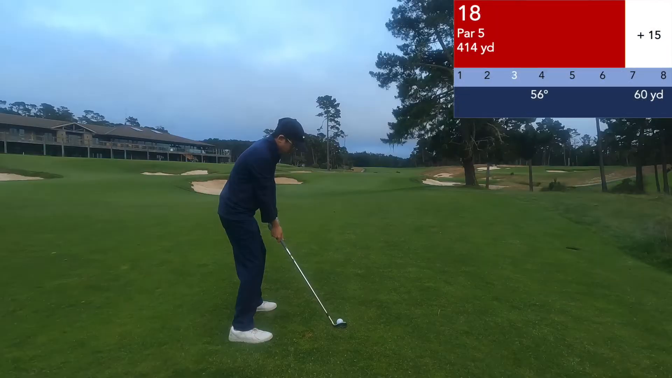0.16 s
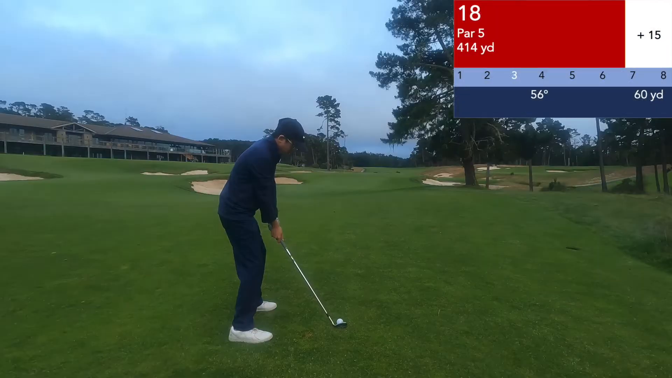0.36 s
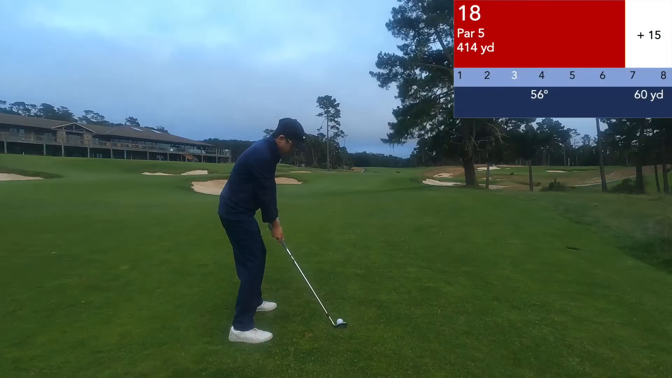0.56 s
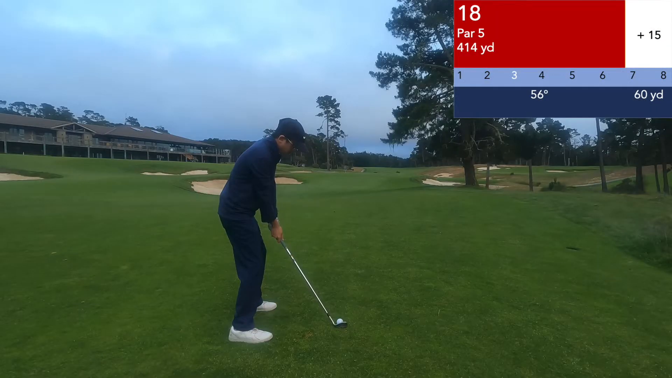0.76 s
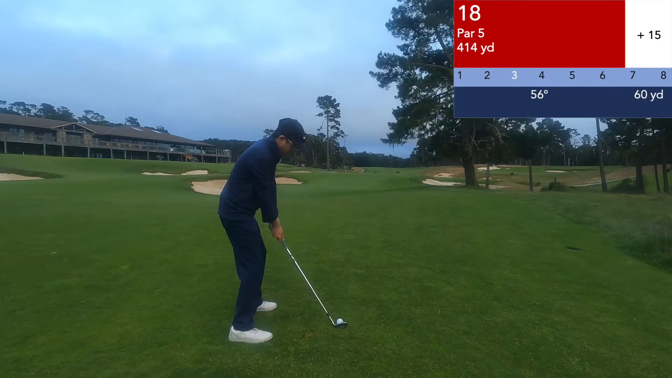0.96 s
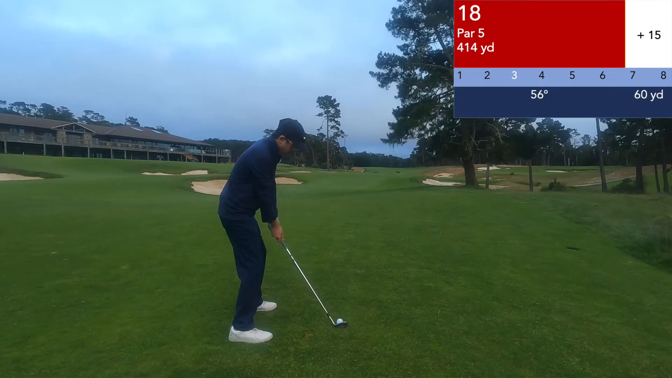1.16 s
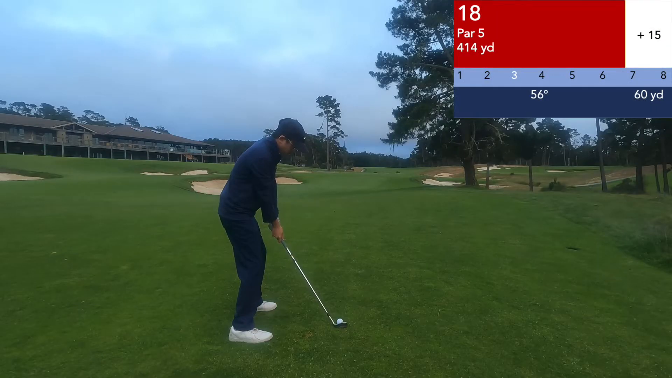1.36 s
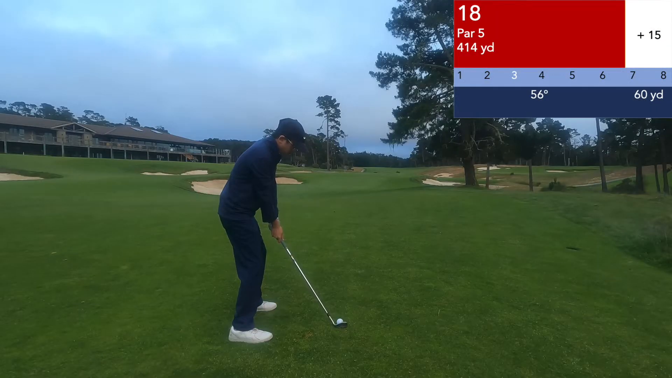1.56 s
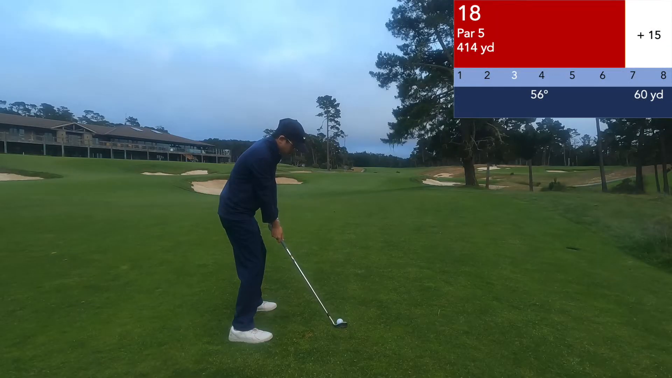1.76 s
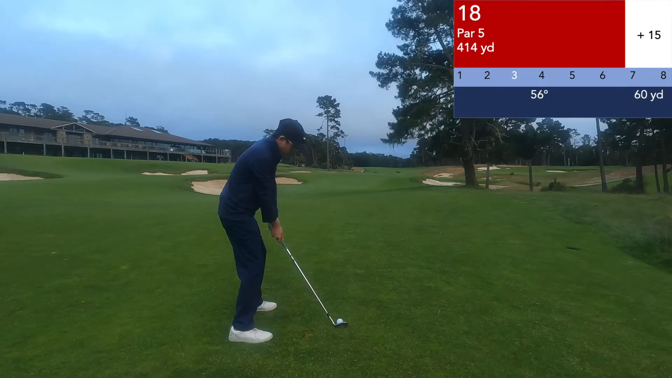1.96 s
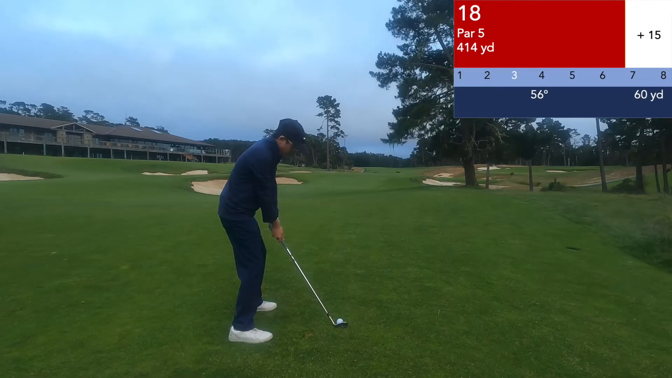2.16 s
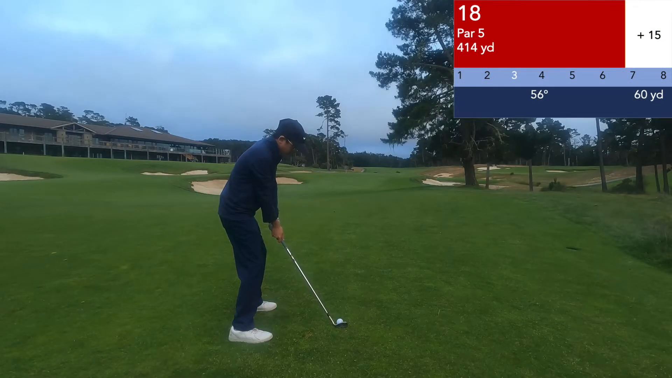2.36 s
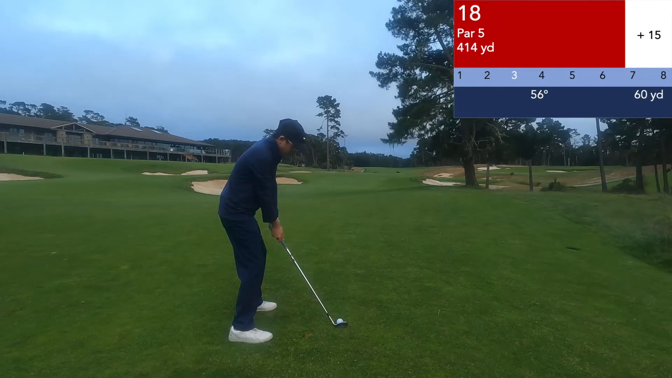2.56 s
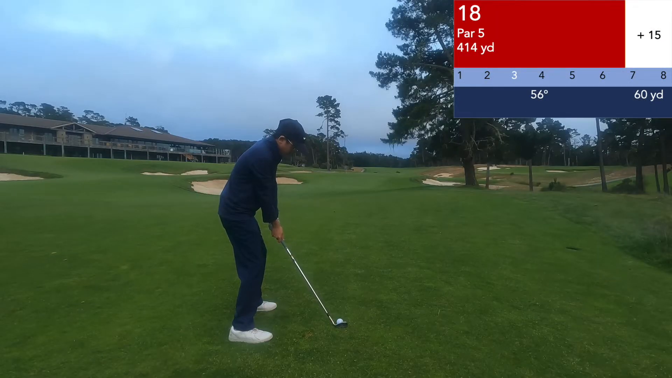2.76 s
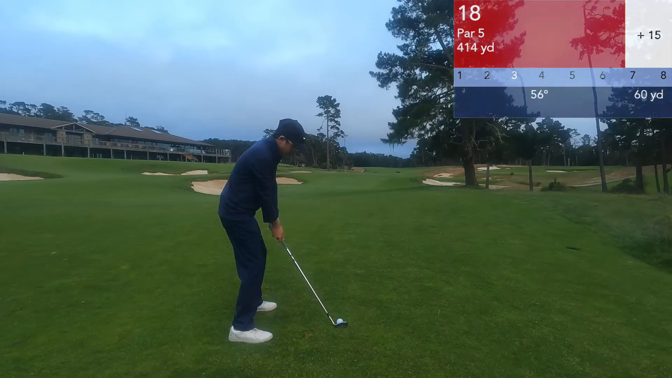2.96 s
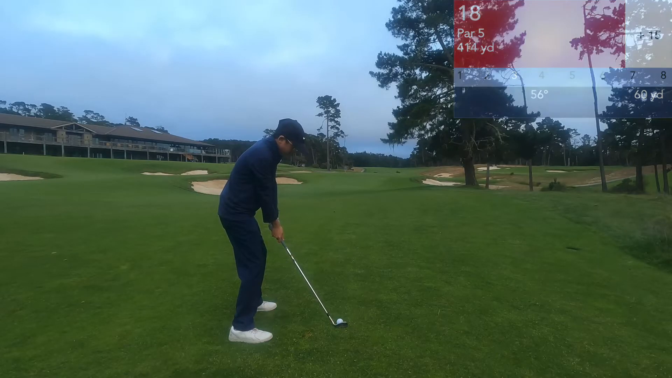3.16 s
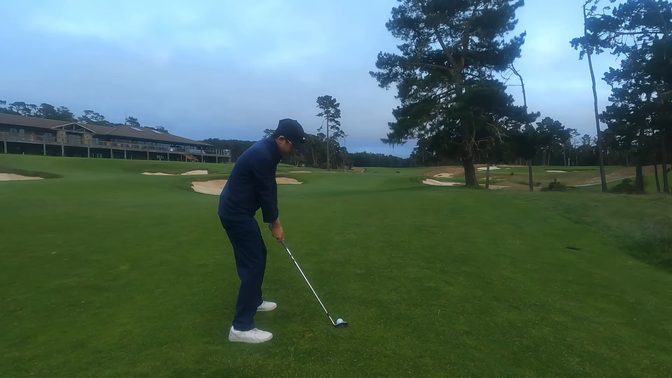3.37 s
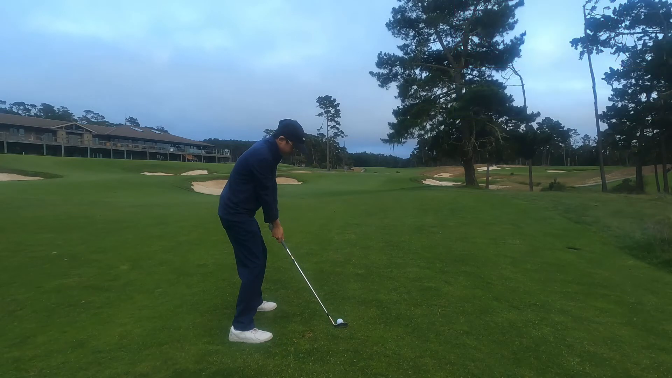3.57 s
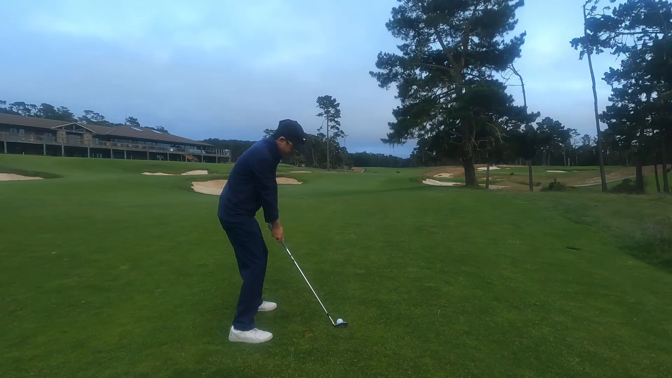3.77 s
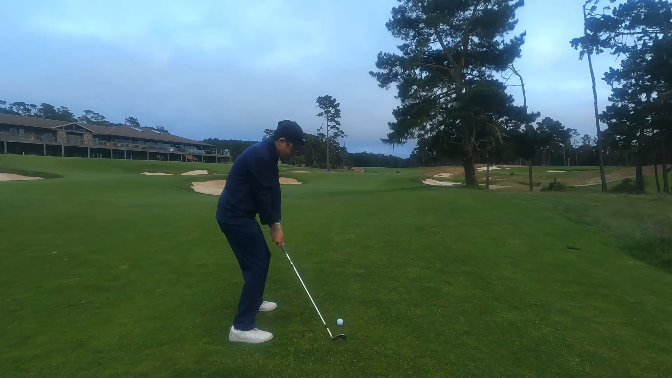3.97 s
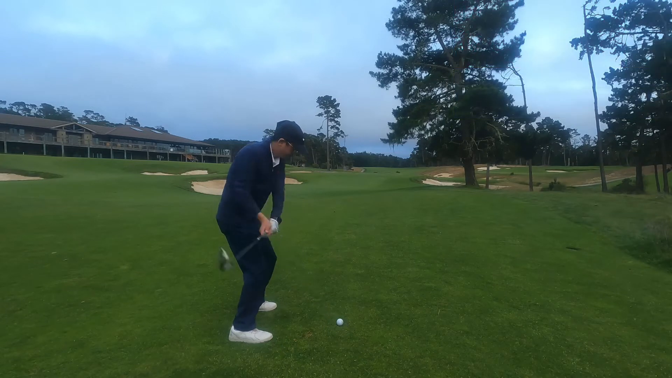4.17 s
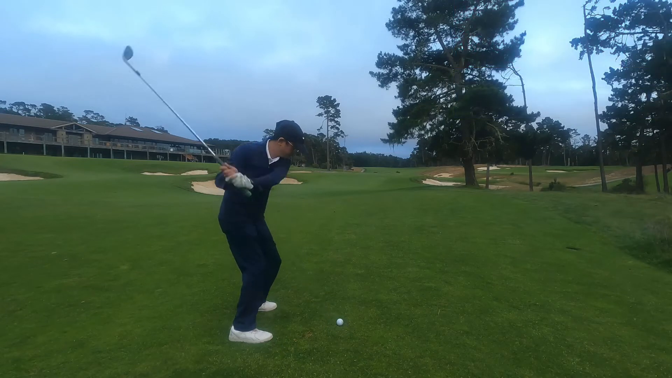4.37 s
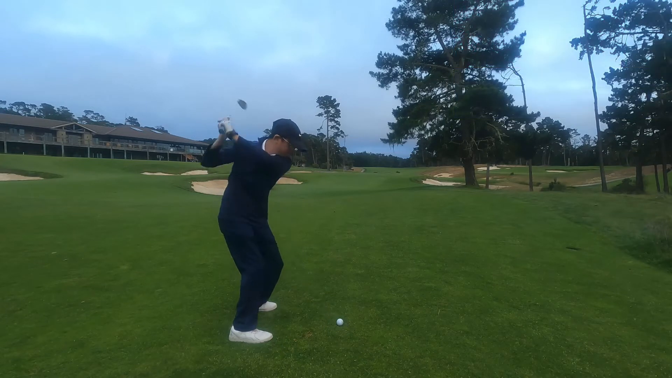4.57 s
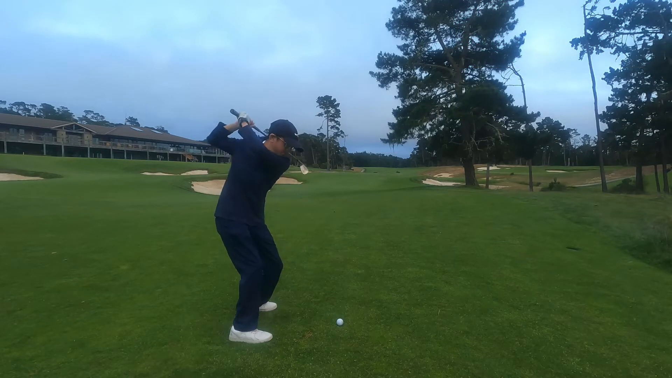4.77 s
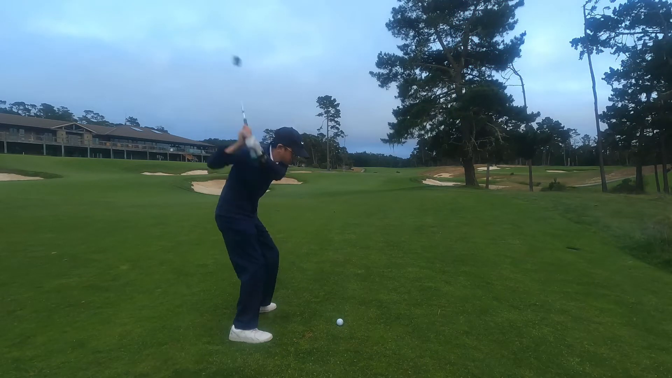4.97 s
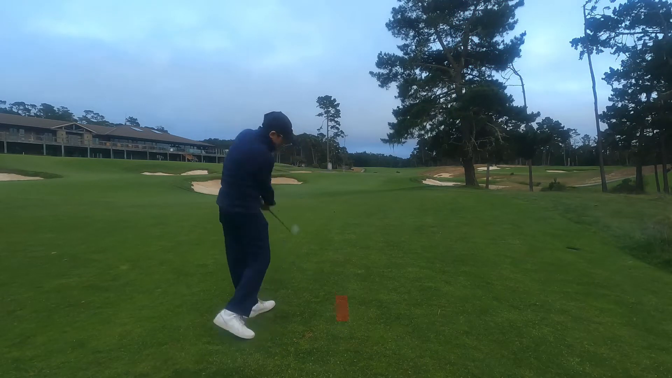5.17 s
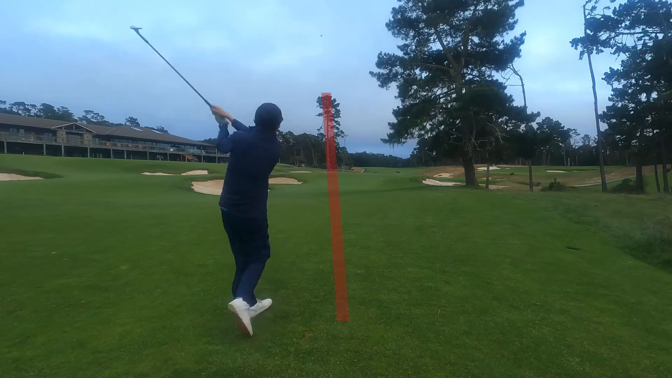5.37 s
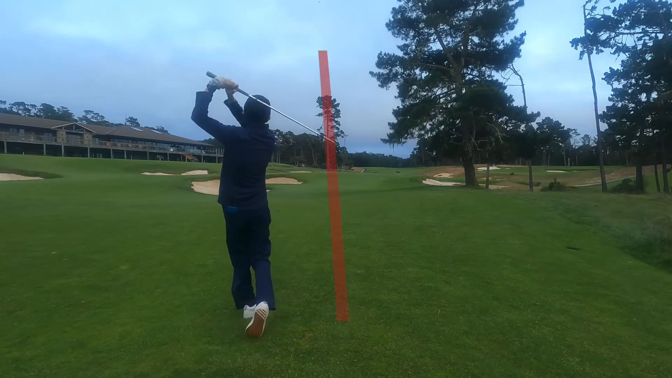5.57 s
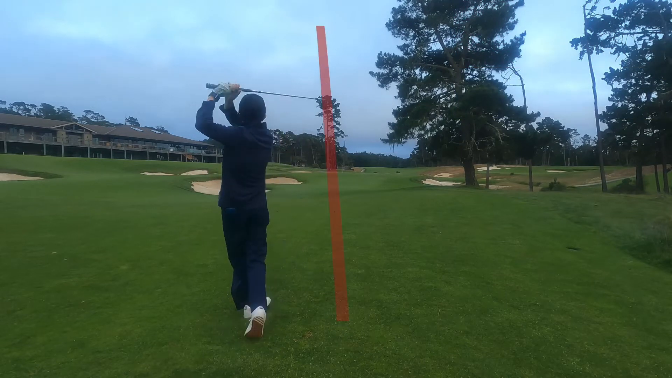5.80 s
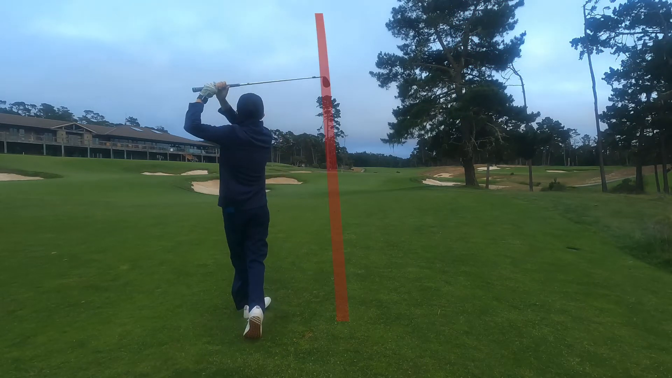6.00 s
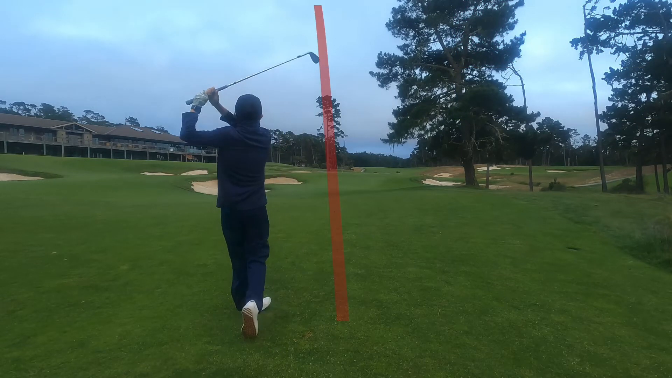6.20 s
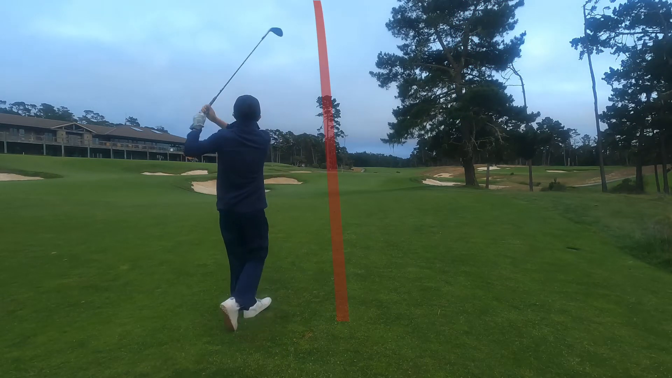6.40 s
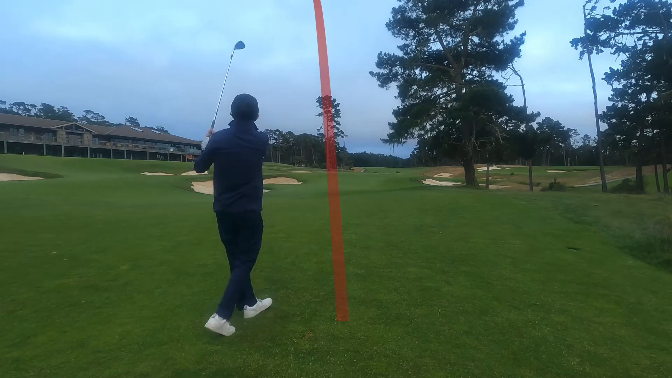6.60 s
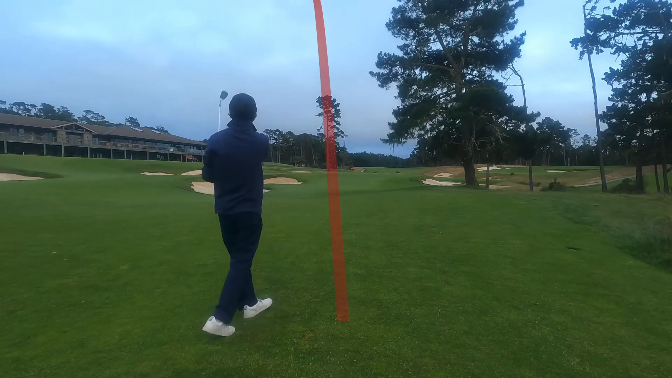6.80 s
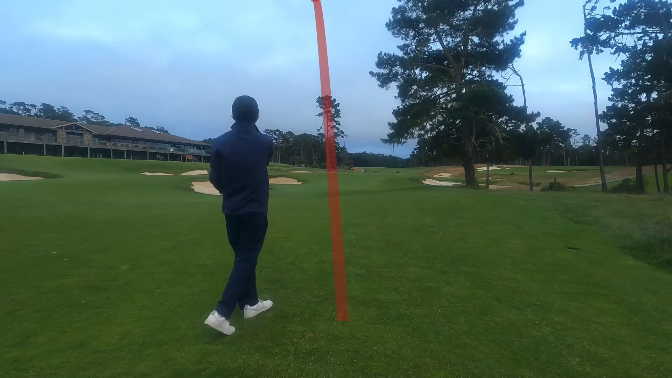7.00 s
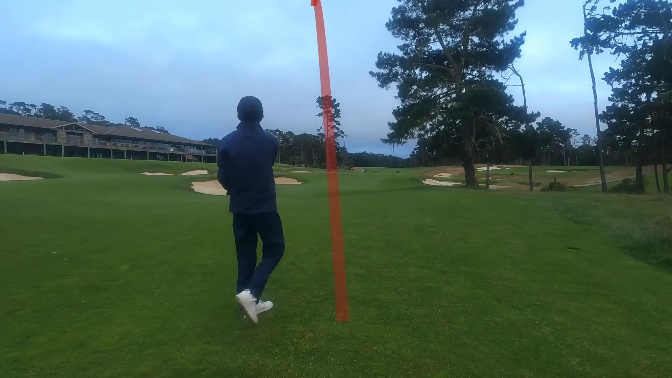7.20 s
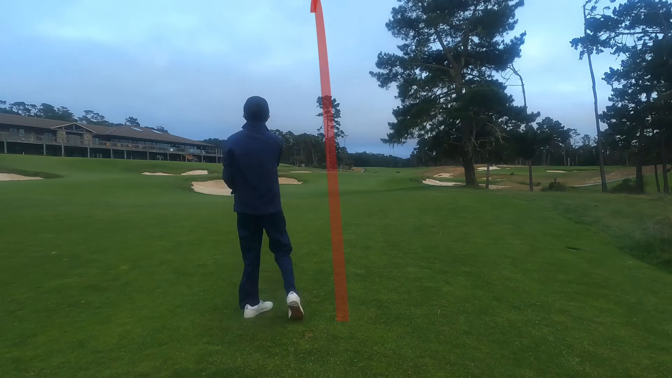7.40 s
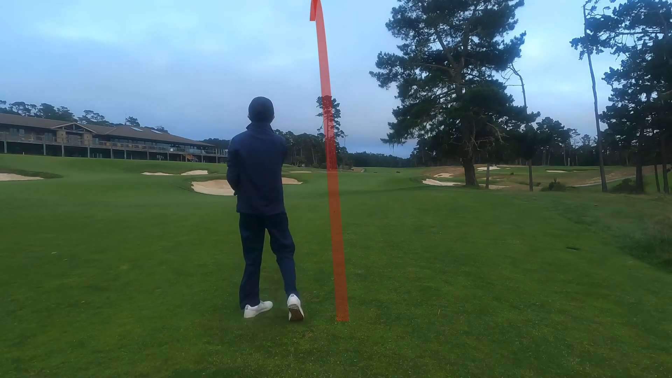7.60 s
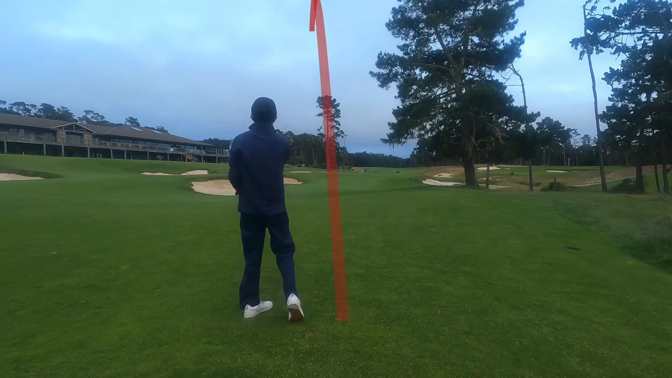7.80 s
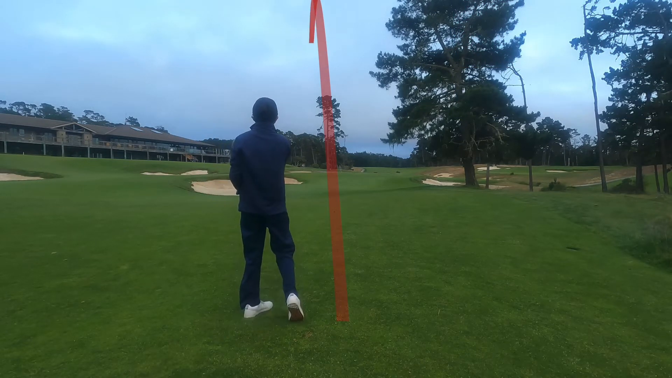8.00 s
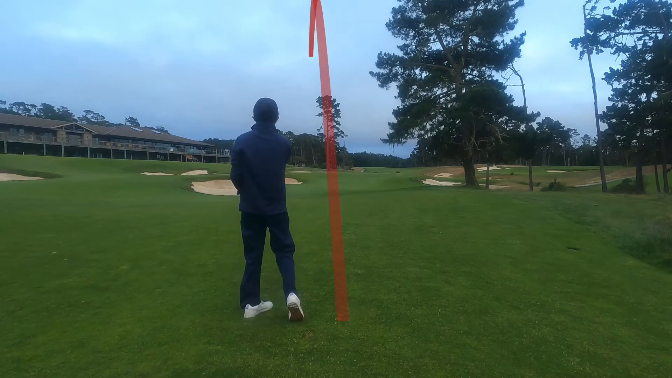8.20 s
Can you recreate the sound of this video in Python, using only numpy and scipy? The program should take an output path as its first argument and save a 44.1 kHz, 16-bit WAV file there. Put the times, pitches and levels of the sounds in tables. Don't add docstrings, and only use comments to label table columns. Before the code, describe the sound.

A golf wedge whips through the air and cracks a ball off soft turf while songbirds warble over a low distant rumble.

```python
import sys
import numpy as np
from scipy import signal
from scipy.fft import rfft, irfft, next_fast_len
from scipy.io import wavfile

SR = 44100
rng = np.random.default_rng(int(sys.argv[2]) if len(sys.argv) > 2 else 0)


def generate_wav(signal):
    frames = np.transpose(np.atleast_2d(signal))
    scaled = np.clip(frames, -1, 1) * 32767
    pcm = np.round(scaled).astype(np.int16)
    wavfile.write(sys.argv[1], SR, pcm)


def volts_from_decibels(level):
    exponent = np.asarray(level, float) / 20
    return 10 ** exponent


N = 363774


def rms_one(x):
    return x / np.sqrt(np.mean(x ** 2) + 1e-20)


def at_hz(points, hz):
    table_hz, value = np.transpose(points)
    return np.interp(np.log(hz), np.log(table_hz), value)


def level_curve(s, db):
    return volts_from_decibels(np.interp(np.arange(N) / SR, s, db, left=-150, right=-150))


def sides(db):
    return volts_from_decibels(np.multiply.outer([.5, -.5], db))


def drift(rate_hz, size=N):
    r = np.exp(-2 * np.pi * rate_hz / SR)
    noise = rng.standard_normal(size + SR)
    return rms_one(signal.lfilter([1], [1, -2 * r, r * r], noise)[SR:])


def ring(clicks, hz, t60):
    r = volts_from_decibels(-60 / (t60 * SR))
    w = 2 * np.pi * hz / SR
    return signal.lfilter([0, np.sin(w)], [1, -2 * r * np.cos(w), r * r], clicks + 1e-18)


def click(s, soft_hz, order=2):
    out = np.zeros(N)
    out[round(s * SR)] = 1
    return signal.sosfilt(signal.butter(order, soft_hz, fs=SR, output="sos"), out)


def trees(x, t60, wet_db):
    u = np.arange(SR // 2) / SR
    shared = rng.standard_normal(len(u))
    own = rng.standard_normal((2, len(u)))
    fade_in = np.clip(u / 0.0071, 0, 1)
    tail = (shared + .6 * own) * volts_from_decibels(-60 * u / t60) * fade_in
    tail = tail / np.sqrt(np.sum(tail ** 2, axis=1, keepdims=True))
    return x + volts_from_decibels(wet_db) * signal.fftconvolve(x, tail, axes=1)[:, :N]


def port(x):
    return signal.sosfilt(signal.butter(5, 7600.0, fs=SR, output="sos"), x)


def ring_modes(hit, modes):
    return sum(volts_from_decibels(db) * sides(lean_db)[:, None] * ring(hit, hz, t60) for hz, db, t60, lean_db in modes)


def torn_grass():
    # start_s, level_db
    divot = [(5.1587, -51), (5.16, -26), (5.167, -33), (5.171, -47), (5.19, -67.5), (5.28, -58),
             (5.361, -63)]
    grains = rng.standard_normal(N) * volts_from_decibels(4.3 * drift(400.0))
    band = signal.butter(1, [300.0, 1500.0], "band", fs=SR, output="sos")
    torn = rms_one(signal.sosfilt(band, grains))
    return torn * level_curve(*np.transpose(divot)) * sides(4.3)[:, None]


def strike():
    # pitch_hz, level_db, t60_s, left_minus_right_db
    face_modes = [(937, -8, 0.032, 17), (1147, 3, 0.0064, 16), (1834, -8, 0.041, 6)]
    # pitch_hz, level_db, t60_s, left_minus_right_db
    blade_modes = [(3450, -22.5, 0.012, 9), (4500, -35, 0.018, 6), (5320, -28.5, 0.017, -9),
                   (6700, -39, 0.014, -10)]
    # pitch_hz, impact_level_db, t60_s, sole_level_db
    turf_modes = [(57.7, -2.5, 0.17, -10), (150, -8, 0.065, -9.5), (200, 2, .04, 3.5), (300, -22, .03, 1)]
    strike_s, sole_s = 5.1597, 5.1765
    squash = click(strike_s - .0002, 1350.0, order=4)
    hard_edge = click(strike_s, 9000.0)
    crack = -ring_modes(squash, face_modes)
    blade = ring_modes(hard_edge, blade_modes)

    first, second = click(strike_s + 0.00081, 500.0), click(sole_s, 450.0)
    thump = sum(ring(volts_from_decibels(db) * first + volts_from_decibels(sole_db) * second, hz, t60)
                for hz, db, t60, sole_db in turf_modes)
    t = np.arange(N) / SR
    thump = thump * np.clip((strike_s + 0.056 - t) / 0.027, 0, 1)
    bright = trees(volts_from_decibels(-10) * crack + blade + torn_grass(), 0.46, -27.5)
    return port(bright) + volts_from_decibels(-22) * thump


def swish():
    # start_s, level_db, shedding_hz
    passes = [
        [(5.04, -59, 300), (5.075, -56, 338), (5.095, -46, 403), (5.12, -37, 427), (5.14, -46.5, 527),
         (5.158, -37, 600)],
        [(5.175, -52.5, 402.4), (5.21, -57, 345.3), (5.24, -73, 406.4), (5.285, -56, 462), (5.32, -71, 392),
         (5.4, -74, 400)],
    ]
    parts = ((1.0, 3.0, 60.4), (2.1, -2.5, 200.0), (3.0, -6.5, 300.0), (9.0, -25.0, 2100.0))
    out, t = np.zeros(N), np.arange(N) / SR
    for rows in passes:
        s, db, hz = np.transpose(rows)
        phase = 2 * np.pi * np.cumsum(np.interp(t, s, hz)) / SR
        bands = sum(volts_from_decibels(part_db) * drift(width_hz) * np.sin(multiple * phase)
                    for multiple, part_db, width_hz in parts)
        out += level_curve(s, db) * bands
    return out * sides(3.0)[:, None]


def snaps():
    # start_s, level_db, brightness_hz (the band spans 0.28 to 0.75 of it)
    snap_events = [(.54, -59, 9550), (1.352, -54, 9100), (3.526, -41, 6570), (3.546, -48, 5500),
                   (3.904, -56.5, 9100), (3.959, -50, 7350), (4.44, -47.5, 7970), (5.29, -49, 5000),
                   (5.369, -64, 7000), (5.46, -56, 5000)]
    out = np.zeros(N)
    decay = volts_from_decibels(-60 * np.arange(600) / SR / 0.015)
    for s, db, hz in snap_events:
        band = signal.butter(2, [hz * 0.28, min(hz * 0.75, 15000)], "band", fs=SR, output="sos")
        burst = signal.sosfilt(band, rng.standard_normal(600) * decay)
        out[round(s * SR):][:600] += volts_from_decibels(db + 5.0) * burst / np.abs(burst).max()
    return out * sides(2.5)[:, None]


def add_note(out, s, length, hz_points, db, edge_s, flutter, swell_db=0.0):
    # pitch_hz, left_minus_right_db
    perch_side = [(2000, -3.5), (2400, -3.5), (2750, 13.5), (3100, 16.5), (3350, 14.5), (3900, 8.5),
                  (4500, -2.5)]
    whole_s = length + edge_s
    u = np.arange(round(whole_s * SR)) / SR - edge_s / 2
    glide = np.polyfit([0, length / 2, length], hz_points, deg=2)
    hz = np.polyval(glide, np.clip(u, 0, length))
    at = max(round((s - edge_s / 2) * SR), 0)
    shape = signal.windows.tukey(len(u), min(2 * edge_s / whole_s, 1))
    shape = shape * volts_from_decibels(db + swell_db * (u / length - 1))
    note = shape * np.sin(2 * np.pi * np.cumsum(hz) / SR) * sides(at_hz(perch_side, hz))
    out[:, at:at + len(u)] += note[:, :N - at] * flutter[at:at + len(u)]


def birds():
    # start_s, length_s, start_hz, middle_hz, end_hz, level_db
    warble_notes = [(0.049, 0.036, 3067.0, 3140, 3020, -49.5), (0.08, 0.021, 3070, 2900, 2650, -47.5),
                    (0.677, 0.036, 2830, 2810, 2760, -54.5), (1.284, 0.042, 3124.0, 2970, 2560, -47.5),
                    (1.918, 0.027, 2750, 2830, 2955.0, -53), (1.943, 0.021, 3320, 3370, 3266.0, -50.5),
                    (1.965, 0.022, 2960, 2920, 2970, -43), (2.003, 0.048, 2884.0, 2840, 2850, -47.5),
                    (2.138, 0.029, 3160, 2890, 2950, -47.4), (2.184, 0.03, 3200, 2900, 2640, -36.5),
                    (2.294, 0.045, 2524, 2620, 2580, -49), (2.304, 0.069, 3040, 3160, 2980, -52.4),
                    (2.336, 0.054, 2700, 2695.0, 2870, -45), (2.391, 0.033, 2620, 2732.0, 2750, -51),
                    (2.42, 0.02, 2730, 2544, 2750, -46), (2.443, 0.024, 2776.0, 2690, 2820, -47.5),
                    (2.819, 0.047, 3210, 3430, 3350, -40), (2.869, 0.027, 3330, 3087, 2760, -34.5),
                    (2.885, 0.022, 3452.0, 3110, 2870, -46), (2.9, 0.019, 2730, 2560, 2480, -40),
                    (2.951, 0.016, 3030, 2840, 2690, -45), (3.374, 0.031, 2546, 2716, 2672.0, -46),
                    (3.39, 0.021, 2625, 2704, 2680, -36.5), (3.416, 0.018, 2585, 2650, 2830, -44.5),
                    (3.456, 0.033, 2575, 2640, 2650, -41.5), (3.483, 0.027, 2624, 2610, 2590, -44.5),
                    (3.546, 0.042, 2660, 2540, 2580, -46), (3.582, 0.042, 2576, 2546.0, 2570, -49),
                    (4.174, 0.027, 2709.0, 2740, 2601.0, -40.5), (4.187, 0.07, 2940, 2992, 3129.0, -38),
                    (4.294, 0.036, 2910, 3044, 2980, -54), (4.778, 0.023, 3090, 2780, 2710, -38),
                    (4.801, 0.021, 2770, 2590, 2617.0, -53), (4.873, 0.024, 2505, 2640, 2580, -43.5),
                    (4.899, 0.02, 2651.0, 2686, 2620, -36.5), (5.324, 0.025, 2995, 2910, 2770, -44),
                    (5.342, 0.021, 2725, 2916.0, 3333.0, -43), (5.376, 0.021, 3120, 2940, 2830, -39.5),
                    (5.388, 0.0098, 2810, 2760, 2570, -32.5), (5.455, 0.02, 3000, 2900, 3039.0, -51),
                    (5.474, 0.074, 2336, 2380, 2450, -53.5), (5.527, 0.046, 2670, 2639.0, 2700, -49),
                    (5.568, 0.025, 2795.0, 2655, 2730, -49.5), (5.59, 0.03, 2660, 2692.0, 2520, -47.5),
                    (5.621, 0.038, 2740, 2710, 2870, -49.2), (5.668, 0.015, 2710, 2760, 2877.0, -53),
                    (5.78, 0.013, 3500, 3220, 3053.0, -48.5), (6.208, 0.036, 2446.0, 2760, 2820, -51.0),
                    (6.249, 0.019, 3275, 3320, 3330, -53), (6.267, 0.022, 3260, 3030, 3265.0, -49),
                    (6.29, 0.023, 3350, 3343.0, 3237.0, -54), (6.31, 0.022, 3160, 3040, 3166.0, -52.5),
                    (6.344, 0.022, 2990, 2840, 2809.0, -48.0), (6.822, 0.053, 3340, 3300, 3350, -50),
                    (6.868, 0.048, 3205, 3166, 3060, -49.0), (6.92, 0.017, 2847.0, 2880, 3137.0, -45),
                    (7.437, 0.06, 2730, 2908.0, 2909.0, -51), (7.466, 0.033, 3270, 3366, 3269.0, -50.5),
                    (7.508, 0.02, 3278.0, 3390, 3290, -46), (7.525, 0.032, 3030, 3051.0, 3083.0, -52),
                    (7.527, 0.014, 3320, 3360, 3341.0, -51.9), (7.556, 0.029, 2890, 2900, 2720, -47),
                    (7.585, 0.036, 2960, 3075.0, 3101.0, -51.9), (8.097, 0.061, 3237.0, 3120, 3330, -48.5),
                    (8.153, 0.041, 2860, 2720, 2750, -47.5), (8.193, 0.053, 2670, 2730, 2660, -49),
                    (0.006, 0.031, 3377.0, 3280.0, 3275.0, -58), (0.093, 0.015, 2700, 2517.0, 2397.0, -63),
                 (0.63, 0.034, 3920, 3987.0, 3944.0, -51.5), (1.231, 0.07, 3440, 3240, 3156.0, -56),
                 (1.353, 0.052, 2234, 2195.0, 2188.0, -63), (1.485, 0.063, 2280, 2240, 2170, -62),
                 (1.65, 0.026, 3160, 3450, 3440, -61.5), (1.735, 0.029, 3120, 3200, 3230, -60.5),
                 (1.785, 0.033, 3966.0, 3955.0, 3916.0, -52.5), (1.814, 0.027, 2650, 3090, 3300, -54.5),
                 (1.976, 0.03, 3270, 3347.0, 3293.0, -52), (2.046, 0.016, 2700, 2770, 2534.0, -59),
                 (2.064, 0.016, 2850, 2830, 2856.0, -51), (2.164, 0.03, 3900, 4000, 3950, -55),
                 (2.168, 0.035, 3390, 3600, 3050, -50), (2.17, 0.04, 1930, 1960, 1800, -59),
                 (2.216, 0.069, 2570, 2384, 2400, -54.5), (2.472, 0.02, 2610, 2579.0, 2744.0, -51),
                 (2.495, 0.047, 3950, 3600, 3100, -58.5), (2.681, 0.031, 4107.0, 4270, 3978.0, -55.5),
                 (2.77, 0.04, 2830, 2515.0, 2252.0, -56), (2.983, 0.027, 3050, 2920, 3224.0, -56.5),
                 (3.002, 0.048, 2440, 2240, 2198.0, -55.5), (3.043, 0.037, 3290, 3460.0, 3406.0, -58.2),
                 (3.303, 0.034, 3350, 3450, 3386.0, -56.3), (3.405, 0.025, 3850, 3900, 3926.0, -54),
                 (3.643, 0.055, 2380, 2463.0, 2535.0, -53.5), (3.685, 0.042, 2470, 2470, 2521.0, -53),
                 (3.818, 0.028, 4350, 4390, 4302.0, -53.5), (4.104, 0.093, 2210, 2207.0, 2297.0, -55),
                 (4.128, 0.026, 2740, 2615, 2664.0, -50.5), (4.262, 0.07, 2610, 2420, 2420, -53.5),
                 (4.404, 0.031, 3430, 3350, 3430.0, -54), (4.458, 0.03, 3648.0, 3970, 3816.0, -50.5),
                 (4.644, 0.013, 3560, 3289.0, 3172.0, -52), (4.726, 0.053, 3230, 3640, 3507.0, -53),
                 (4.775, 0.045, 4400, 3900, 3580, -57), (4.95, 0.018, 4200, 3780, 3400, -55),
                 (5.058, 0.04, 4030, 4030, 3730, -54.5), (5.106, 0.024, 3327.0, 3375.0, 3519.0, -54.5),
                 (5.232, 0.032, 4830, 4500, 4150, -57), (5.262, 0.025, 4140, 4260, 3855.0, -53),
                 (5.325, 0.019, 4400, 4220, 4250, -59), (5.36, 0.03, 3300, 3750, 3100, -53.5),
                 (5.409, 0.045, 2490, 2300, 2280, -47), (5.472, 0.022, 4260, 4000, 3640, -52.5),
                 (5.494, 0.021, 3680, 3252.0, 3147.0, -51), (5.63, 0.037, 3350, 3130, 3098.0, -53.5),
                 (5.686, 0.013, 2850, 2760, 2742.0, -49), (5.788, 0.021, 3860, 3920, 3890, -54),
                 (5.929, 0.052, 3400, 3000, 2650, -59.5), (6.1, 0.091, 3000, 2580, 2480, -63),
                 (6.658, 0.014, 2790, 2770, 2712.0, -55), (6.671, 0.12, 2720, 2490, 2480, -65.5),
                 (6.776, 0.028, 2453, 2530, 2517.0, -55.5), (7.086, 0.014, 2310.0, 2415.0, 2406.0, -52),
                 (7.112, 0.019, 2250, 2270, 2177.0, -56), (7.228, 0.055, 2950, 2916.0, 2738.0, -56.5),
                 (7.517, 0.034, 4035, 4058, 4054, -57), (7.673, 0.026, 3070, 2737.0, 2710, -56),
                 (7.709, 0.037, 1900, 1979.0, 1870.0, -52.5), (8.07, 0.025, 2670, 2900, 3100, -54)]
    # start_s, high_level_db, low_level_db
    trill_pairs = [(1.8343, -56.5, -52.5), (1.957, -57, -48), (2.0815, -56.5, -46.5), (2.2061, -56, -46),
                   (2.326, -53.5, -45.5), (2.4493, -53.5, -47), (2.579, -56.5, -45.5), (2.7067, -56.5, -47),
                   (2.831, -59, -47.5), (2.962, -61.5, -48.5), (6.3936, -64, -57.5), (6.514, -59, -52),
                   (6.6343, -52.5, -50), (6.758, -54, -48.5), (6.8806, -54, -48.5), (7.004, -54, -46.5),
                   (7.1263, -56.5, -49), (7.2524, -57.5, -46.5), (7.3776, -56, -47.5), (7.5057, -58, -47.5),
                   (7.638, -52, -49.5), (7.766, -56, -47), (7.9084, -57, -50.5)]
    # lead_s, length_s, start_hz, middle_hz, end_hz
    low_lead_s, low_length_s, *low_hz = (.072, .032, 5500, 5050, 4450)
    high_lead_s, high_length_s, *high_hz = (.010, .024, 7500, 6350, 5850)
    song, trill = np.zeros((2, N)), np.zeros((2, N))
    flutter = volts_from_decibels(2.8 * drift(90.0))
    for s, length, *hz_points, db in warble_notes:
        add_note(song, s, length, hz_points, db - 5.0, .007, flutter)
    for s, high_db, low_db in trill_pairs:
        add_note(trill, s - low_lead_s, low_length_s, low_hz, low_db, .012, flutter, swell_db=7.5)
        add_note(trill, s - high_lead_s, high_length_s, high_hz, high_db + 1.0, .007, flutter, swell_db=12.5)
    return trees(song, 0.38, -5.5) + trees(trill, 0.42, -6.0)


def stereo_noise(spectrum):
    # pitch_hz, likeness
    likeness = [(60, 1), (120, 0.88), (240, 0.77), (470, 0.45), (930, 0.76), (1840, 0.71), (3640, 0.64),
                (7220, 0.88)]
    # pitch_hz, left_minus_right_db
    lean = [(60, 0.5), (100, -1.5), (170, -0.5), (300, -2), (500, -2), (860, 3.5), (1460, 1.5), (2490, 9.5),
            (4240, -0.5), (7220, 2)]
    # centre_hz, width_hz, level_db
    housing = [(1064, 123, 3), (1790, 150, 4), (2900, 230, 7.5), (4950, 170, 5), (6420, 250, 4.5),
               (10960, 73, 11)]
    size = next_fast_len(N)
    hz = np.maximum(np.arange(size // 2 + 1) * SR / size, 1)
    mid, side = rfft(rng.standard_normal((2, size)))
    alike = np.clip(at_hz(likeness, hz), 0, 1)
    pair = np.sqrt(1 + alike) * mid + np.sqrt(1 - alike) * side * [[1], [-1]]
    peaks_db = sum(db / (1 + ((hz - centre) / width) ** 2) for centre, width, db in housing)
    colour = volts_from_decibels(at_hz(spectrum, hz) + peaks_db) * sides(at_hz(lean, hz))
    return rms_one(irfft(pair * colour, size)[:, :N])


def distance():
    # start_s, level_db
    drone_levels = [(0.0, -52), (0.34, -47.5), (0.5, -59), (0.82, -44), (0.89, -60), (1.49, -51),
                    (1.54, -62.5), (2.13, -46.5), (2.18, -59), (2.34, -47.5), (2.48, -55), (2.57, -44.5),
                    (2.89, -60), (3.35, -49.5), (3.4, -69), (3.44, -55.5), (5.1, -48), (5.12, -54),
                    (5.17, -36.5), (5.37, -61.5), (5.65, -51), (5.9, -59.5), (6.11, -50.5), (7.19, -52),
                    (7.26, -47), (7.65, -54), (7.79, -47), (8.25, -67)]
    # pitch_hz, level_db_per_hz
    rumble_colour = [(13, -40.5), (22, -14.5), (43, -9), (60, -1.5), (70, -6), (86, -9), (119, -7),
                     (181, -11), (258, -20.5), (450, -34), (580, -67.5), (990, -120)]
    # pitch_hz, level_db_per_hz
    air_colour = [(300, -27.5), (450, -7), (820, -6.5), (1100, -1.5), (2100, -8.5), (2550, -11), (4300, -6),
                  (5200, -9.5), (5900, -18.5), (7700, -25.5), (8300, -32.5), (10500, -38), (13000, -49.5),
                  (14000, -81)]
    s, db = np.transpose(drone_levels)
    t = np.arange(N) / SR
    drone_level = volts_from_decibels(np.interp(t, s, db) + 3.0 + 1.7 * drift(7.0))
    drone = drone_level * np.sin(2 * np.pi * 56.85 * t + .6 * drift(2.7))
    rumble = volts_from_decibels(-53 + .8 * drift(1.1)) * stereo_noise(rumble_colour)
    air = volts_from_decibels(-58.5 - 1.0 + 0.91 * drift(0.48)) * stereo_noise(air_colour)
    return drone + rumble + air


def camera_ticks():
    ticks = [(.0672, .0030), (.0795, .0028), (.5316, -.0080), (.5430, .0025)]
    picture_rate_hz, width_s = 29.94, 8.5e-5
    train = np.zeros(N + SR)
    pictures = np.arange(N / SR * picture_rate_hz)
    for place, size in ticks:
        train[np.round((pictures + place) / picture_rate_hz * SR).astype(int)] = size
    u = np.arange(-30, 31) / SR / width_s
    spikes = np.convolve(train[:N], (1 - u ** 2) * np.exp(-u ** 2 / 2), "same")
    return (spikes + .03 * ring(spikes, 3000.0, 0.02)) * volts_from_decibels([[0.0], [-2.5]])


def scene():
    return strike() + swish() + snaps() + birds() + distance() + camera_ticks()


def top_cut(x):
    return signal.sosfilt(signal.butter(12, 13030, fs=SR, output="sos"), x)


def record(dry):
    return top_cut(dry)


dry = scene()
out = record(dry)
generate_wav(out)
```